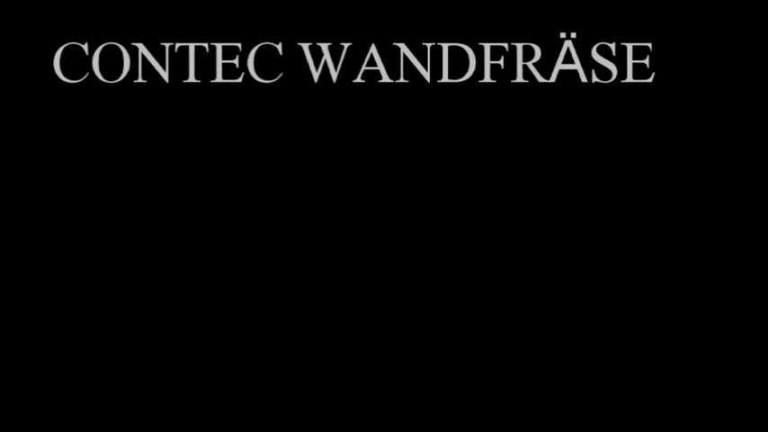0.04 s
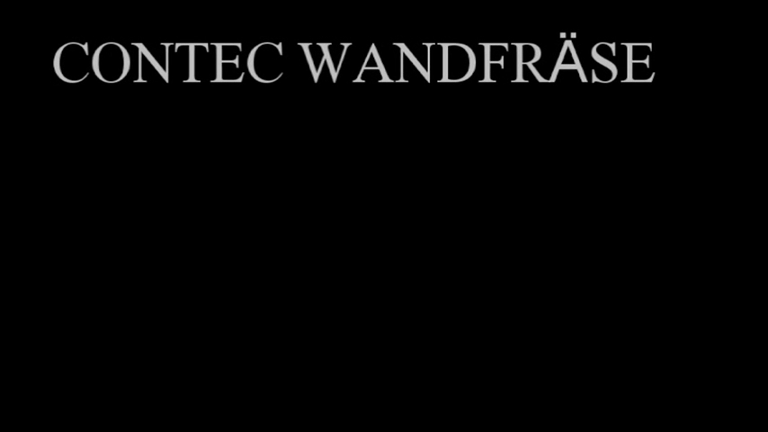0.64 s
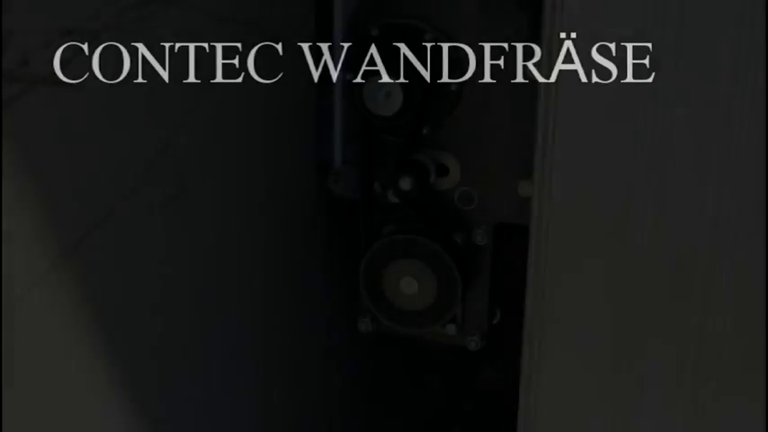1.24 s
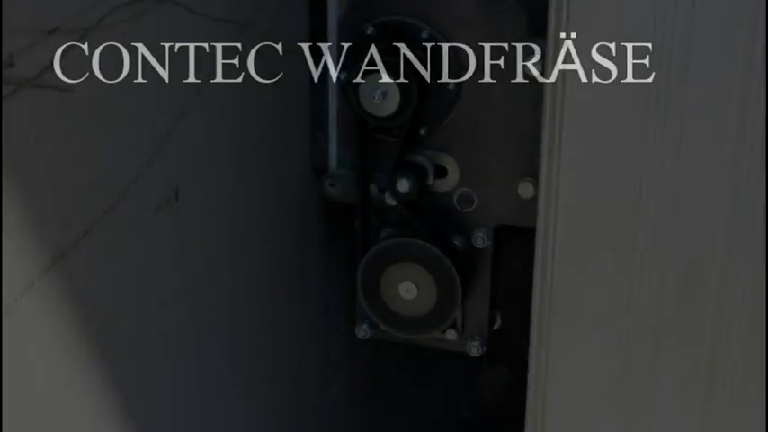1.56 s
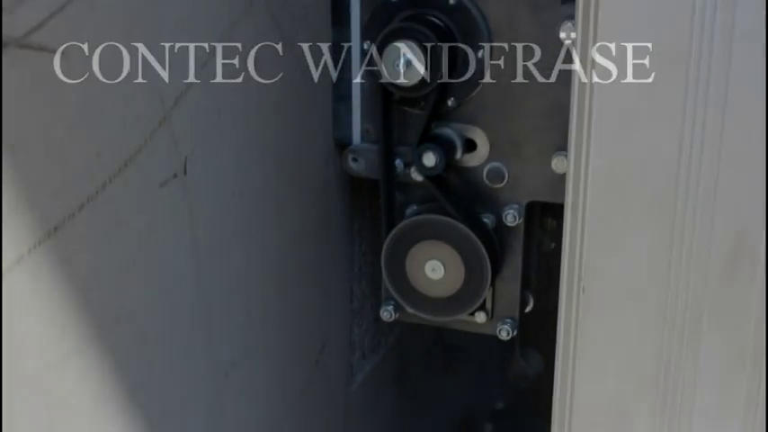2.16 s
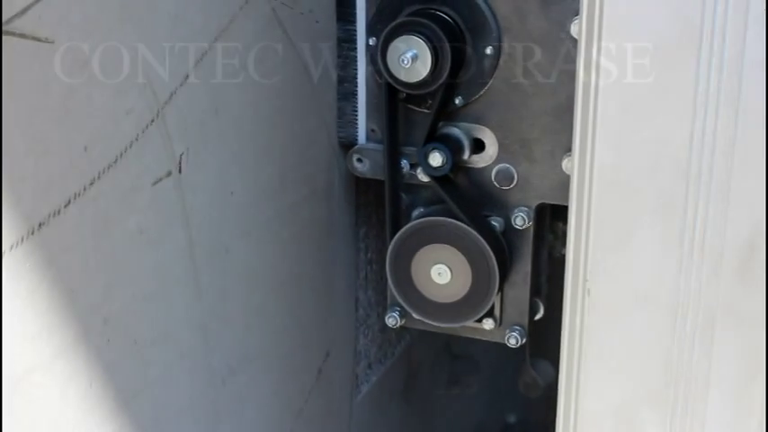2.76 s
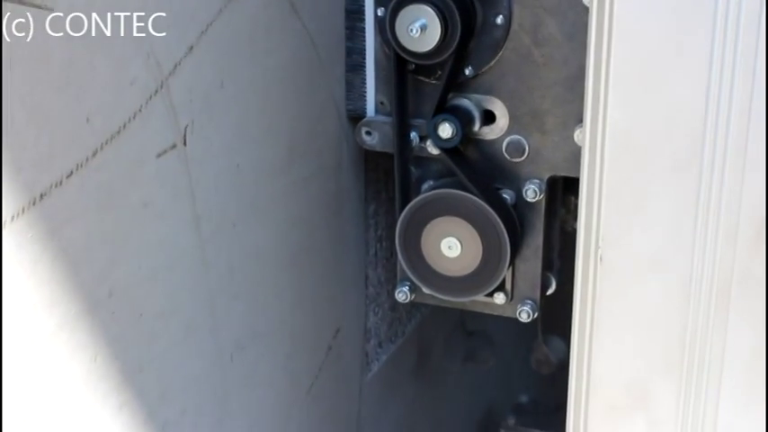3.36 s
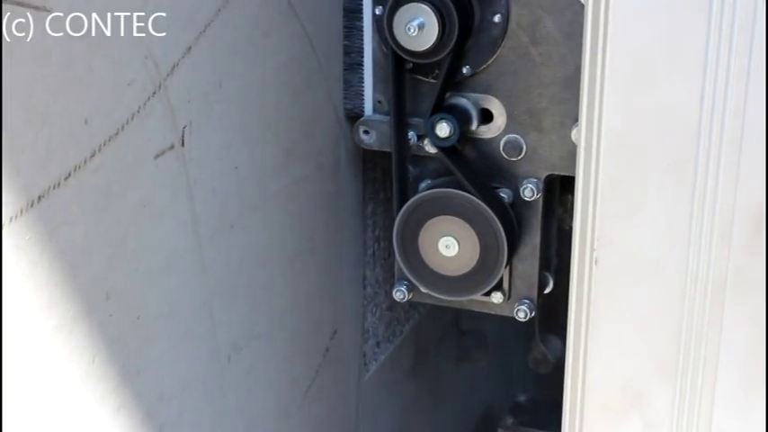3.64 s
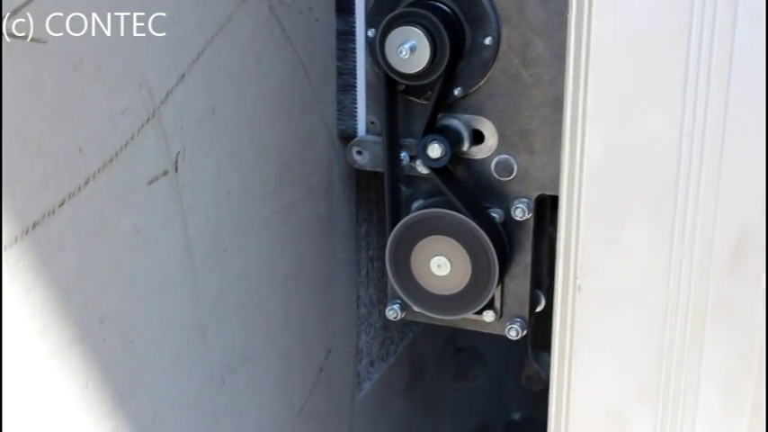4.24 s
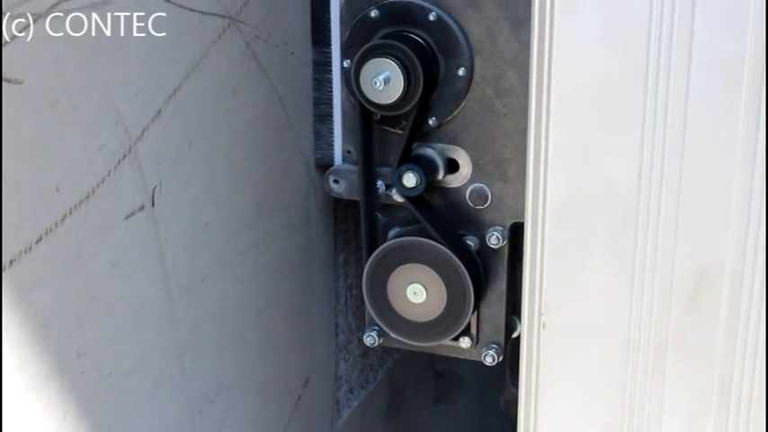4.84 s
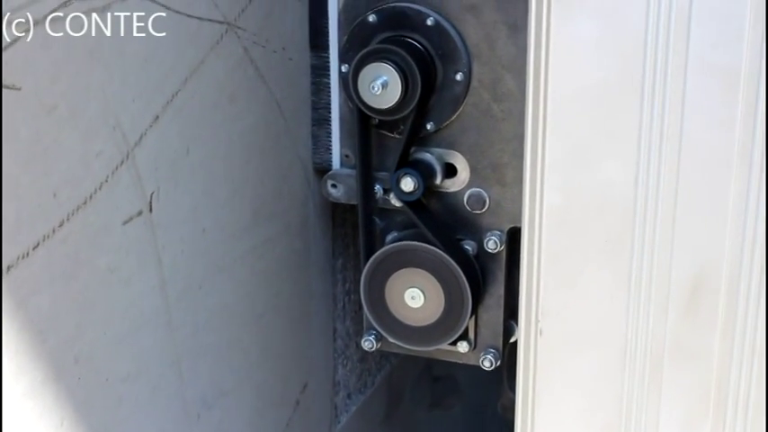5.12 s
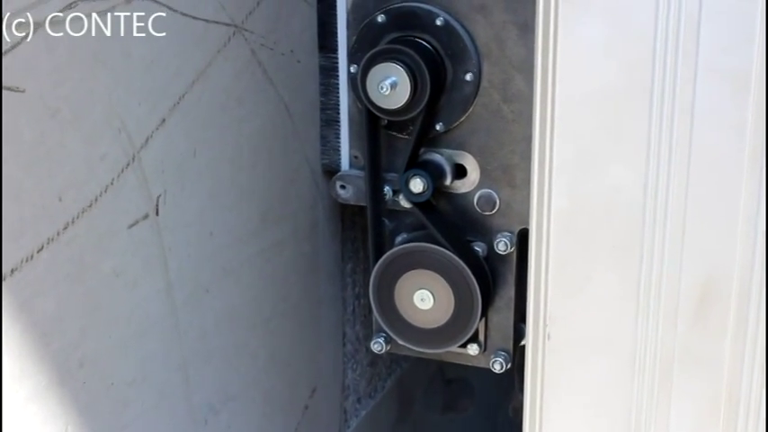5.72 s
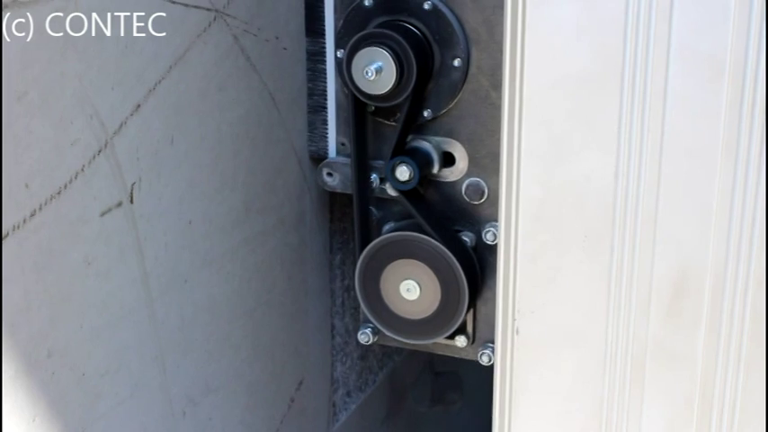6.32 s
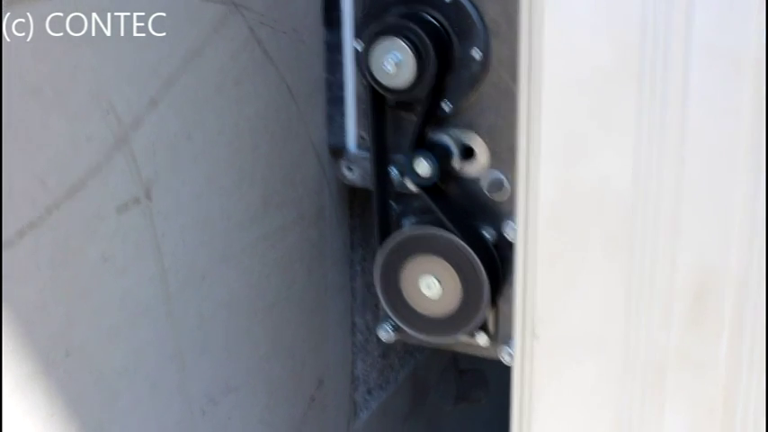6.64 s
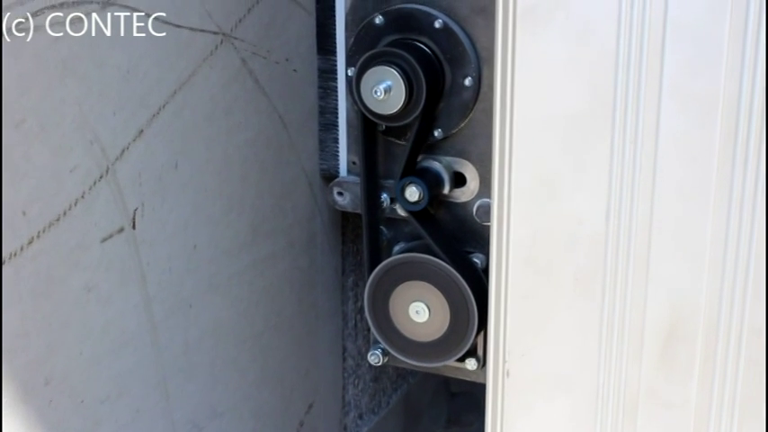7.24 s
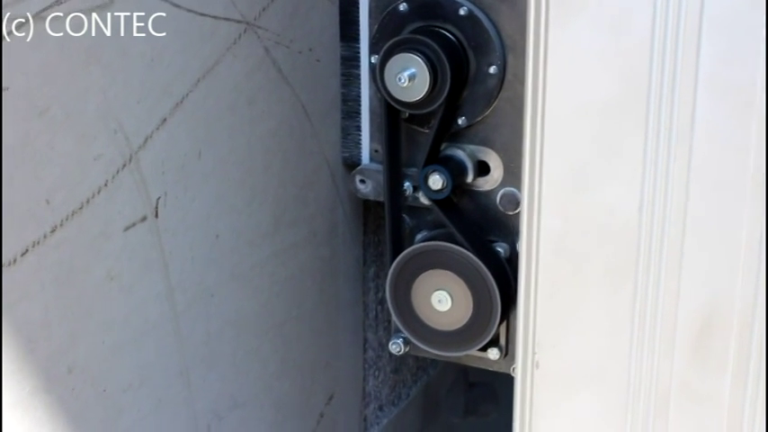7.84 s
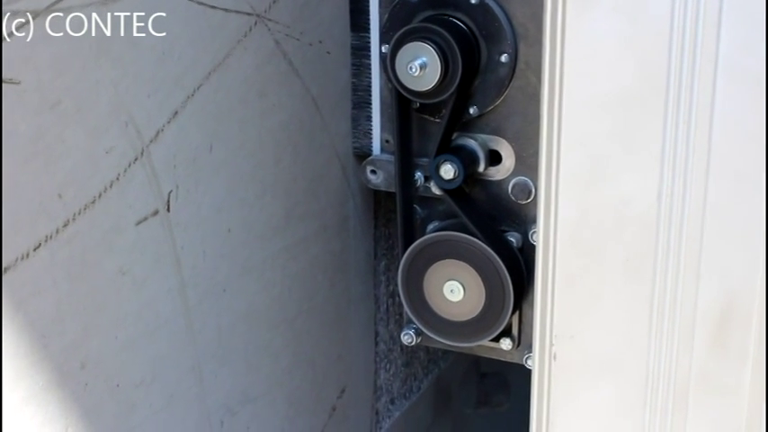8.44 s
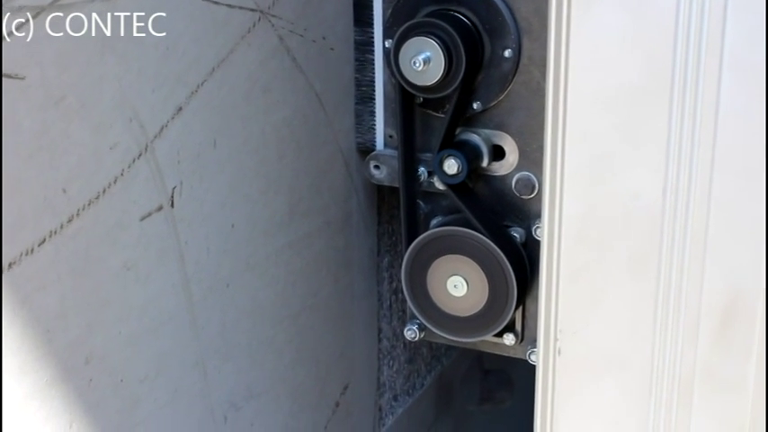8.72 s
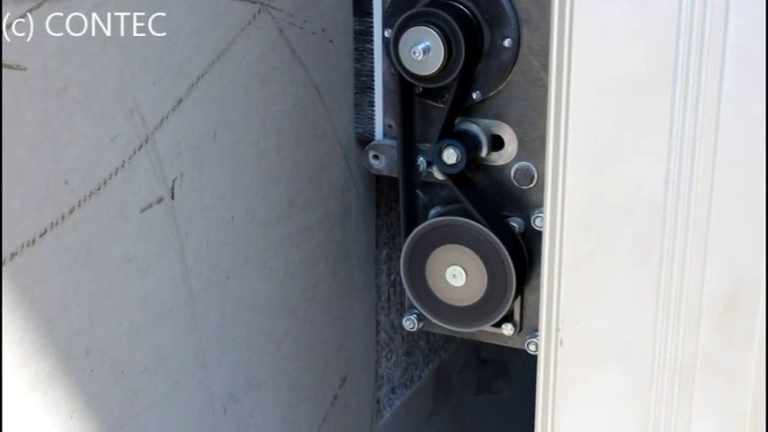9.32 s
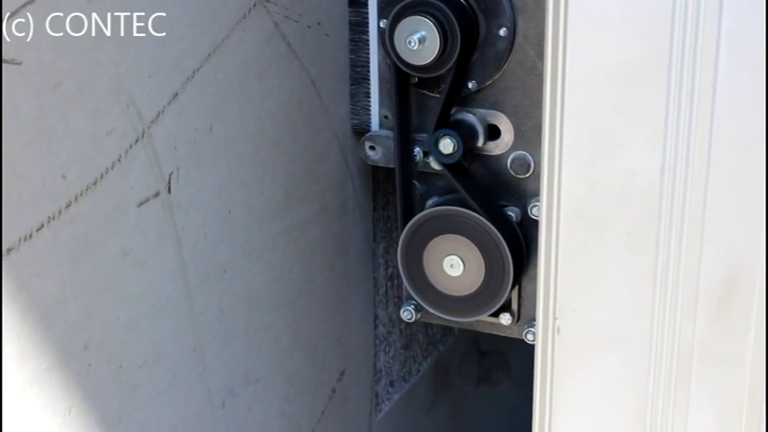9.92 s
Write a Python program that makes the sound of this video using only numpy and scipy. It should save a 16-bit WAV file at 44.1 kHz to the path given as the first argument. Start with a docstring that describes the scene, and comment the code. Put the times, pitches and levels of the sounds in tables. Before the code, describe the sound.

After a brief silence, a belt-driven milling machine cuts in abruptly, already grinding a plaster wall. The spinning cutters make a loud, dense, buzzing rasp over a steady motor hum and low rumble. High whines and squeals swell and fade as the cutters catch, while grit crackles and the steel hood rings. One dull bump comes early, and the grinding carries on without a break, heard close up in mono.

```python
"""Close to a plaster wall, a belt-driven milling machine grinds away; the sound is mono and cuts in abruptly.
The cutter drum turns about 71 times a second and sags a little under load, humming, whining and squealing.
Every turn scrapes almost the same pattern as the last, so the rasp is a dense buzz that slowly changes.
Grit sprays, the cutters set the steel hood ringing, and the frame rumbles underneath."""
import sys
import numpy as np
from scipy import signal
from scipy.fft import rfft, irfft, next_fast_len
from scipy.io import wavfile
from scipy.ndimage import uniform_filter1d, map_coordinates

SR = 44100
rng = np.random.default_rng(int(sys.argv[2]) if len(sys.argv) > 2 else 0)


def store_wav(level_fs):
    """Save 16-bit WAV to argv[1]."""
    pcm = np.round(np.clip(np.atleast_2d(level_fs), -1, 1) * 32767)
    wavfile.write(sys.argv[1], SR, pcm.T.astype(np.int16))


N = 440118

# The drum slows as it is pushed into the wall, then recovers.
# Each row: time in seconds, speed in turns a second.
DRUM_SPEED = [(0.92, 71.95), (1.5, 71.51), (2.2, 70.9), (2.9, 70.68), (3.7, 70.66), (4.9, 71.17),
              (5.7, 71.41), (6.7, 71.56), (8.2, 71.44), (9.3, 71.22), (9.95, 71.17)]


def amp(db):
    """Decibels to gain."""
    return 10 ** (np.asarray(db) / 20)


def unit(x):
    """Scale to rms 1."""
    return x / np.sqrt(np.mean(x ** 2) + 1e-20)


def curves(rows):
    """One value per sample for each column after the time."""
    times, *columns = np.transpose(rows)
    return [np.interp(np.arange(N) / SR, times, column) for column in columns]


def wobble(rate):
    """A smooth random curve, rate knots a second."""
    knots = rng.standard_normal(400)
    steps = np.arange(0, N, 64)
    return np.interp(np.arange(N), steps, map_coordinates(knots, [steps * rate / SR], mode="wrap"))


def swing(rate):
    """A slow random swell that stays between -1 and 1."""
    return np.tanh(wobble(rate))


def flutter(rate):
    """A fast random flutter, rate knots a second."""
    return unit(np.interp(np.arange(N) * rate / SR, np.arange(N), rng.standard_normal(N)))


def spell(start, length, rise_s=0.2, fall_s=0.23):
    """A fade in and out, capped at 1; start and length are taken at half height."""
    t = np.arange(N) / SR
    return np.clip(np.minimum((t - start) / rise_s, (start + length - t) / fall_s) + 0.5, 0, 1)


def filtered(x, response):
    """Filter x by a complex response of frequency."""
    size = next_fast_len(N + SR // 2)
    return irfft(rfft(x, size) * response(np.fft.rfftfreq(size, 1 / SR)), size)[:N]


def coloured(x, spectrum):
    """Equalise x through (Hz, dB) points, at rms 1."""
    points_hz, db = np.transpose(spectrum)
    return unit(filtered(x, lambda hz: amp(np.interp(np.log(hz + 1), np.log(points_hz), db))))


def slowing():
    """Load on the drum: turns a second below its mean speed."""
    speed, = curves(DRUM_SPEED)
    return speed.mean() - speed


def tone(turns, multiple, waver, rate):
    """One partial locked to the drum, wavering in strength and phase."""
    drift = 1 + waver * (wobble(rate) + 1j * wobble(rate))
    return unit(np.real(drift * np.exp(2j * np.pi * (multiple * turns + rng.random()))))


def drum_and_belt(turns, bite_db):
    """The drum drones and hums, its higher partials wavering more; the belt laps once in five turns."""
    # The drum's hum. Each row: multiple of the drum speed, level in dB at average bite.
    hum_partials = [(1, -53.5), (2, -46.5), (4, -43), (5, -43.0), (6, -43.5), (10, -48), (11, -43.5),
                    (12, -46.5), (15, -42.5), (18, -43), (19, -43.5), (20, -45.5), (21, -42), (22, -45),
                    (23, -41.5), (25, -42), (28, -37.5), (29, -51), (30, -48.5), (31, -41.5)]
    # Belt and motor, between the drum's partials. Each row: multiple of the drum speed, level in dB.
    belt_partials = [(5.4, -52.5), (5.6, -60.5), (6.6, -50), (7.2, -42), (7.4, -48), (11.4, -48.5),
                     (15.6, -58), (16.4, -67)]
    # The main drone, three beats a turn. Each row: time in seconds, level in dB.
    drone_levels = [(0.95, -38), (1.8, -33.5), (4.7, -36.5), (7.1, -40), (9.95, -38.3)]
    hum = sum(amp(db) * tone(turns, round(k), waver=0.088 + 0.021 * k, rate=2.62)
              for k, db in hum_partials)
    belt = sum(amp(db) * tone(turns, round(k * 5) / 5, waver=0.43, rate=3) for k, db in belt_partials)
    drone = amp(curves(drone_levels)[0]) * tone(turns, 3, waver=0.08, rate=8)
    return amp(1.5 * (bite_db - bite_db.mean())) * hum + belt + drone


def whines(turns):
    """Partials that follow the load, swell at random and squeal when the cutters catch."""
    # Whines locked to the drum. Each row: multiple of its speed (rounded in use), level in dB,
    # dB gained per turn a second of slowing, random swing in dB.
    partials = [(7, -37, 3, 2), (8, -35.5, 0.5, 1.5), (9, -45, 11.5, 3.5), (13, -42, 0, -0.5),
                (14, -43, 7.5, 3), (16, -39.5, 6, 5.5), (17, -37, 2, 3.5), (24, -39, 1, 3),
                (26, -37, 3, 3.5), (27, -40, 0, 2.5), (47, -40.5, 8, 4), (71.86, -37, -2, -2),
                (95.8, -39, 1.5, 6)]
    # The cutters catch and sing on one partial.
    # Each row: start in seconds, length in seconds, multiple of the drum speed, level in dB.
    squeals = [(0.8, 0.94, 24, -28), (0.8, 0.77, 26, -34), (0.8, 0.47, 7, -32.5), (1.08, 0.16, 48, -26.5),
               (2.9, 0.5, 16, -33), (3.35, 0.38, 17, -31), (4.05, 0.35, 27, -33), (4.35, 0.8, 8, -32.5),
               (4.4, 1.3, 47, -31.5), (4.75, 0.78, 72, -31), (5.0, 0.32, 48, -28.5), (5.15, 0.72, 26, -32),
               (5.35, 1.1, 45, -29.5), (6.398, 2.15, 24, -29), (6.4, 0.55, 17, -32), (6.55, 1.6, 72, -30.5),
               (7.35, 1.36, 13, -36.5), (7.65, 0.28, 27, -28.5), (7.9, 0.68, 16, -34),
               (8.503, 1.5, 24, -31.5), (8.801, 0.85, 17, -31.5), (9.1, 0.7, 45, -33),
               (9.15, 0.45, 26, -31)]
    load = slowing()
    calm = {round(k): amp(db + load_db * load + swing_db * swing(rate=2.2))
            for k, db, load_db, swing_db in partials}
    out = np.zeros(N)
    for multiple in sorted(set(calm) | {round(k) for _, _, k, _ in squeals}):
        squeal = sum(amp(db) * spell(start, length)
                     for start, length, k, db in squeals if round(k) == multiple)
        out += np.maximum(calm.get(multiple, 0), squeal) * tone(turns, multiple, waver=0.14, rate=8)
    return out


def groove(turns, life, size):
    """Noise with size points a turn that repeats every turn and renews itself over life turns."""
    memory = np.exp(-1 / life)
    laps = signal.lfilter([1], [1, -memory], rng.standard_normal((900, size)), axis=0)
    return unit(map_coordinates(laps.ravel(), [(turns + 150) * size], order=3))


def cutting(turns, life, fresh, spiky_db):
    """Cutters scrape the same groove again and again, in bursts, and break a share of fresh grains."""
    grains = np.sqrt(1 - fresh) * groove(turns, life, size=600) + np.sqrt(fresh) * rng.standard_normal(N)
    return grains * amp(spiky_db * groove(turns, life, size=24))


def cutters(turns, bite_db):
    """A coarse rasp that holds its pattern, finer grit that changes sooner and crackles, and dust hiss."""
    # Tone colours of scrape, grit and flying dust. Each row: frequency in Hz, relative level in dB.
    scrape_colour = [(300, -54), (1000, -44), (1750, -5), (2030, -2), (2280, 0.5), (2600, -1), (2950, 1.5),
                     (3300, -5.5), (3800, -6), (4400, -3.5), (4950, -2.5), (5300, -3.5), (6500, -37),
                     (10000, -60)]
    grit_colour = [(2000, -55), (4200, -2.5), (5400, -3.5), (6300, -3.5), (7400, -3), (8700, -4.5),
                   (9600, -7), (10800, -13), (12500, -13), (15700, -14.5)]
    dust_colour = [(3000, -32), (6000, -4), (9000, -2), (11000, 3), (15700, -5)]
    # one side of the drum cuts deeper, and the wall is uneven
    depth = amp(0.44 * np.cos(2 * np.pi * (turns - 0.33)) + 0.76 * wobble(rate=26))
    scrape_db = -3.5 + 0.5 * slowing() + 1.24 * wobble(rate=4.5)
    scrape = coloured(cutting(turns, life=12.6, fresh=0.13, spiky_db=1.5), scrape_colour)
    grains = cutting(turns, life=9, fresh=0.18, spiky_db=1.4)
    crackle = amp(0.77 * flutter(rate=1700))
    grit = steel(coloured(grains * crackle, grit_colour))
    grit = shifting_gap(grit, patchy_db=1.1)
    dust = amp(-18) * coloured(rng.standard_normal(N) * crackle, dust_colour)
    return depth * amp(bite_db) * (amp(scrape_db) * scrape + amp(-0.5) * (grit + dust))


def steel(x):
    """Narrow steel resonances colour the treble."""
    # The steel's high resonances. Each row: centre in Hz, width in Hz, gain in dB.
    resonances = [(5390, 160, 4.5), (5950, 230, 3), (6800, 110, -0.5), (7830, 510, 0.5), (8430, 310, 2.5),
                  (9050, 240, 2.5), (10500, 250, 2), (12500, 400, 1)]
    return filtered(x, lambda hz: amp(sum(db / (1 + (2 * (hz - centre) / width) ** 2)
                                          for centre, width, db in resonances)))


def shifting_gap(x, patchy_db):
    """The gap between drum and wall changes, so its resonances slowly come and go."""
    spectra = signal.stft(x, nperseg=1024)[2]
    patches = uniform_filter1d(rng.standard_normal(spectra.shape), size=6, axis=0)  # across frequency
    patches = uniform_filter1d(patches, size=70, axis=1)  # across time
    return unit(signal.istft(spectra * amp(patchy_db * unit(patches)), nperseg=1024)[1][:N])


def hood(turns):
    """Once a turn the proudest cutters ping the hood's modes; the others keep them rasping."""
    # How hard the cutters strike the hood. Each row: time in seconds, ringing level in dB.
    ringing_levels = [(0.97, -20), (1.22, -23.5), (5.35, -21.5), (5.45, -20), (7.16, -24.5), (7.41, -24),
                      (7.98, -23), (8.03, -21.5), (8.65, -22.5), (8.7, -32), (8.95, -24), (9.9, -21.5)]
    # The hood's modes. Each row: centre in Hz, width in Hz, dB against the average ringing,
    # place of the blow in the turn from 0 to 1, share of the ringing's swell, random swing in dB.
    modes = [(3190, 203, -5.5, .36, 0.92, 2.1), (3560, 115, -9.5, .3, -0.28, 2.5),
             (4003, 260, -4.5, .14, 0.81, 1), (4750, 190, -15, .25, -0.7, 2)]
    ringing_db, = curves(ringing_levels)
    out = np.zeros(N)
    for centre, width, db, place, share, swing_db in modes:
        swell_db = share * (ringing_db - ringing_db.mean()) + swing_db * swing(rate=3.5)
        swell_db += chatter(centre, width)
        scrape = cutting(turns, life=14.8, fresh=0.13, spiky_db=2.5)
        rasp = filtered(scrape, lambda f: (2j * f * width / (centre ** 2 - f ** 2 + 2j * f * width)) ** 2)
        # the more a mode swells, the more of it comes from the single hard blow
        ring = unit(rasp) + amp(-4.5 + 0.87 * swell_db) * ping(turns, centre, place)
        running_rms = np.sqrt(np.abs(uniform_filter1d(ring ** 2, size=8000)) + 1e-12)
        out += amp(ringing_db.mean() + db + swell_db) * ring / running_rms
    return out


def ping(turns, hz, place, rise_s=0.0012, scatter=0.31):
    """A short ring once a turn, each a little different in strength and phase."""
    count, angle = np.divmod(turns - place + 1, 1)
    age = angle / curves(DRUM_SPEED)[0]
    accent, shift = scatter * rng.standard_normal((2, 800))[:, count.astype(int)]
    envelope = (age / rise_s) ** 2 * np.exp(-2 * age / rise_s)
    return unit(envelope * (1 + accent) * np.sin(2 * np.pi * hz * age + shift + 1.84 * wobble(rate=2.5)))


def frame(bite_db):
    """Loose rumble of the frame and falling debris, growing with bite and load."""
    # The rumble's tone colour. Each row: frequency in Hz, relative level in dB.
    colour = [(25, -30), (38, -24), (50, -14), (80, -7), (105, -11), (170, -2), (330, -3), (430, -1.5),
              (520, 2.5), (670, -2), (820, 2.5), (970, -1.5), (1140, 4), (1400, -1), (2200, -2),
              (4000, -28), (12000, -15)]
    return amp(bite_db - 7.5 + 0.5 * slowing()) * coloured(rng.standard_normal(N), colour)


def chatter(hz, width):
    """Extra dB of the hood mode at hz while the cutters chatter on it."""
    # Spells of chatter. Each row: start in seconds, length in seconds, mode in Hz, boost in dB.
    spells = [(1.05, 1.05, 3560, 5), (3.65, 0.4, 3560, 4.5), (5.0, 0.89, 4003, 2.5), (6.95, 1.2, 4750, 6.5)]
    return sum(db * spell(start, length)
               for start, length, mode_hz, db in spells if abs(mode_hz - hz) < width)


def bump():
    """One dull, rumbling bump of low noise."""
    # The bump's envelope. Each row: time in seconds, level in dB.
    levels = [(1.5, -64), (1.56, -33), (1.63, -27.5), (1.72, -38), (1.85, -35), (2.0, -80)]
    # Its bass-heavy colour. Each row: frequency in Hz, relative level in dB.
    colour = [(30, -38), (70, -20), (105, -1), (150, -5), (250, -10), (450, -35), (2000, -80)]
    return amp(curves(levels)[0]) * coloured(rng.standard_normal(N), colour)


def scene():
    """The machine, alike in both channels; its tones, rasp and pings follow the angle of the drum."""
    # How hard the drum bites. Each row: time in seconds, grinding level in dB.
    bite_levels = [(0.97, -20), (1.96, -21), (2.19, -20), (4.03, -21.5), (4.3, -20), (6.14, -21.5),
                   (6.79, -21.5), (7.16, -23.5), (7.34, -21), (8.53, -20.5), (8.55, -21.5), (9.0, -22),
                   (9.08, -21), (9.15, -23.5), (9.27, -20.5), (9.9, -22)]
    bite_db, = curves(bite_levels)
    turns = np.cumsum(curves(DRUM_SPEED)[0]) / SR
    tones = drum_and_belt(turns, bite_db) + whines(turns)
    machine = tones + cutters(turns, bite_db) + hood(turns) + frame(bite_db) + bump()
    return np.array([machine, machine])


def record(dry):
    """Silence until the sound is switched on; the highest peaks are rounded off and the top is cut."""
    start_s, ceiling, top_hz = 0.921, 0.8, 15800
    on = np.arange(N) / SR >= start_s
    rounded = dry / (1 + (dry / ceiling) ** 6) ** (1 / 6)
    return np.array([filtered(side * on, lambda hz: np.clip((top_hz - hz) / 200 + 0.5, 0, 1))
                     for side in rounded])


dry = scene()
out = record(dry)
store_wav(out)
```